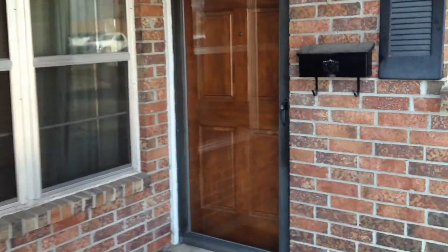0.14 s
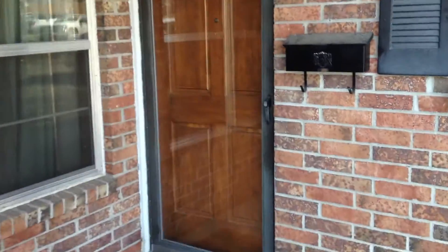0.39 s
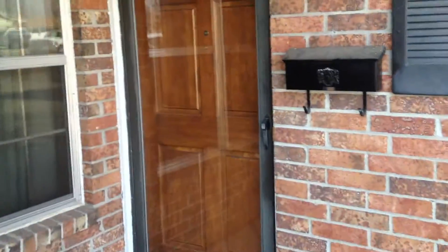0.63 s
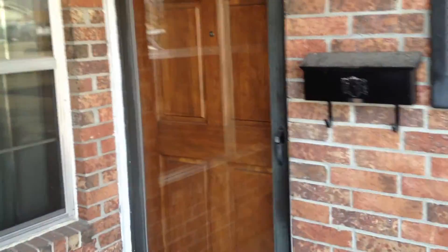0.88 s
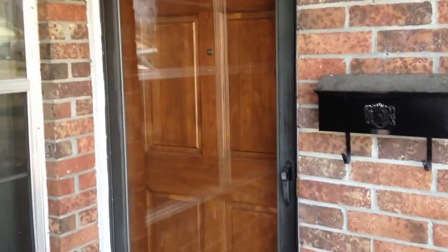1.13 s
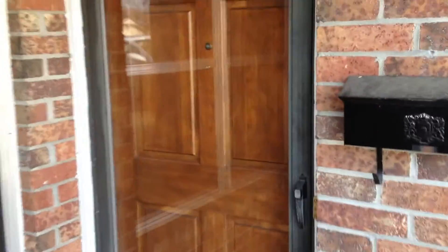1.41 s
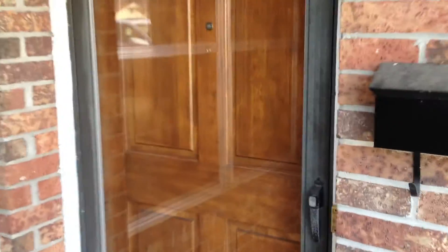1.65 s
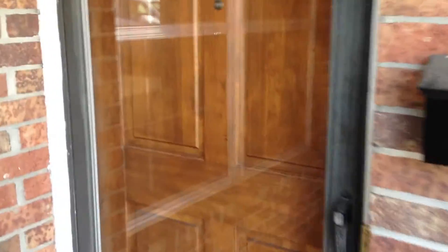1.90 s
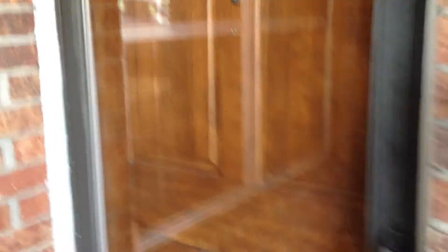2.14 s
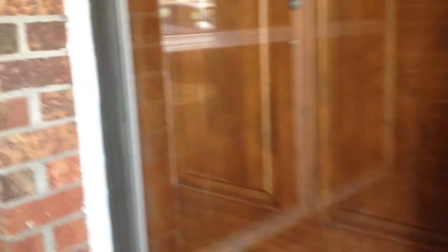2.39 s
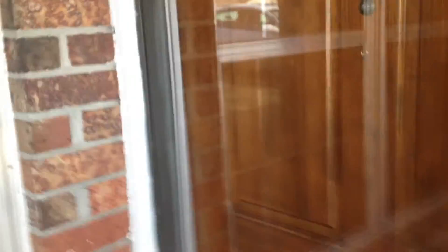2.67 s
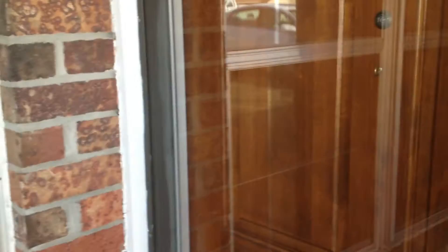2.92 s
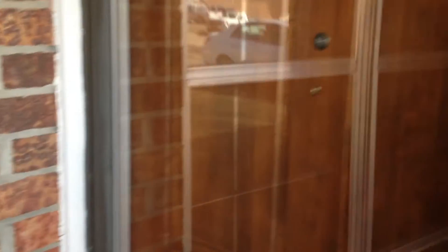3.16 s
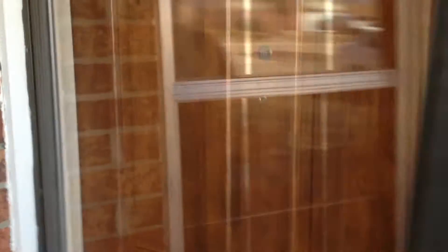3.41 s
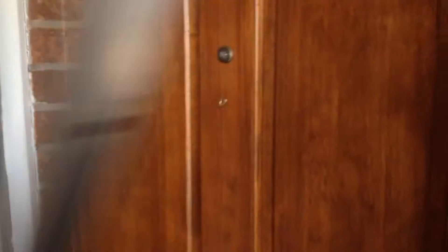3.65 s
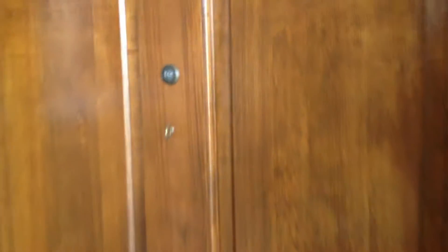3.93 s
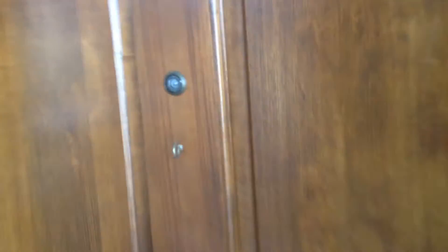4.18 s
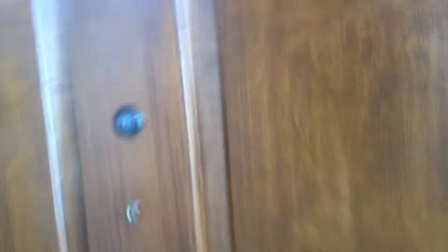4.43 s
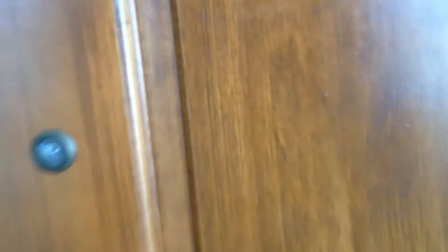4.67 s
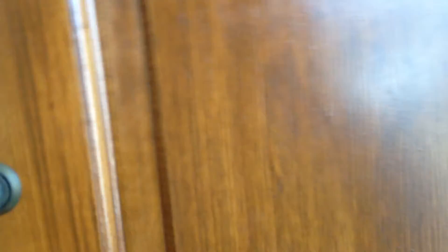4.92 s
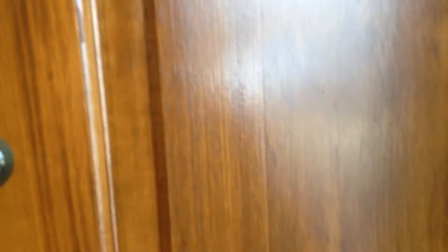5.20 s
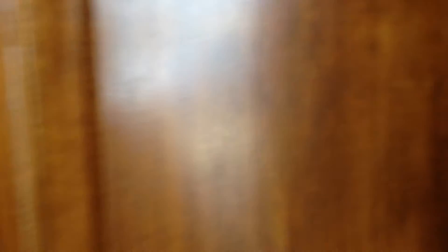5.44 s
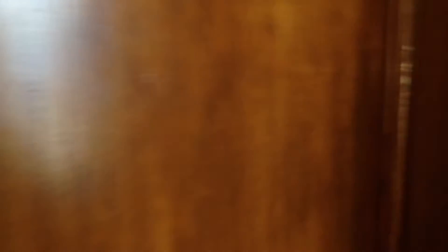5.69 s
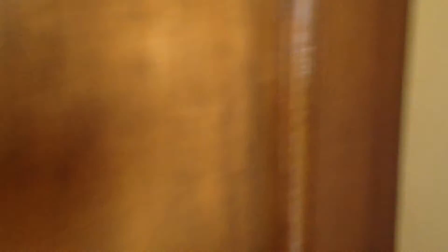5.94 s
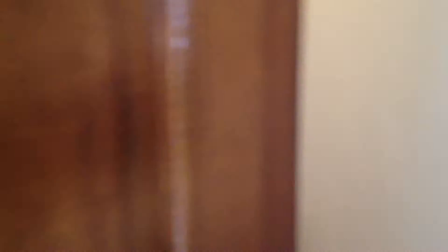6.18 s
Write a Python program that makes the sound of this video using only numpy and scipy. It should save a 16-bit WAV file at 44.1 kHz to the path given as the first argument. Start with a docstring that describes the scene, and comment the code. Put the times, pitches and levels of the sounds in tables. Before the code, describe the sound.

Soft footsteps and chirping birds, sharp metallic handle clicks, a pop of moving air, a knob clack, a woody door thump, and a brief squeak.

```python
"""Footsteps scuff up a porch among birdsong, with light wind on the microphone and a distant hush.
The latch of a glass storm door clatters and drags and its closer rubs: bursts of force and grit in resonances.
Swinging air pops, a knob turns, and the wooden front door knocks free as a slab of ringing modes.
A hinge squeaks last, a fuzzy sine under a rasp. Birds are unsteady sines; wind and hush are coloured noise.
"""
import sys
import numpy as np
from scipy import signal
from scipy.fft import rfft, irfft, next_fast_len
from scipy.io import wavfile
from scipy.ndimage import uniform_filter1d, map_coordinates

SR = 44100
rng = np.random.default_rng(int(sys.argv[2]) if len(sys.argv) > 2 else 0)


def gain_from_db(level_db):
    """Convert decibel levels to linear amplitude factors (20 dB per decade)."""
    decades = np.asarray(level_db, float) / 20
    return 10 ** decades


def unload_audio(sound):
    """Save the sound as a 16-bit wav file, at the path given as the first command line argument."""
    columns = np.transpose(np.atleast_2d(sound))
    # keep every value between -1 and 1, then stretch to whole-number steps
    steps = np.round(np.clip(columns, -1, 1) * 32767)
    wavfile.write(sys.argv[1], SR, steps.astype(np.int16))


N = 278712
TIME = np.arange(N) / SR  # s

# distant outdoor hush over time: start_s, street_db, hiss_db
HUSH_LEVELS = [(0, -53.5, -58), (.8, -56.5, -64.5), (2.7, -55, -61), (3.5, -49, -61), (4.3, -53.5, -58.5),
               (4.9, -52, -63.5), (5.6, -53.5, -62), (5.97, -52, -59.5), (6.32, -55.5, -65)]
# colours of the street and of the hiss: pitch_hz, relative level_db (per Hz)
STREET_COLOUR = [(120, -50.5), (200, -6), (364, -7), (413, -6.5), (504, -10), (943, -10), (1090, -12),
                 (1170, -13), (2450, -12.5), (6000, -23), (7800, -25.5), (13200, -120)]
HISS_COLOUR = [(2650, -5.5), (4500, -3), (5820, -25), (7110, -4), (13000, -4.5), (15300, -10.5),
               (15800, -9)]
# wind buffeting over time: start_s, level_db
WIND_LEVELS = [(0, -58), (.07, -64.5), (.2, -43), (.35, -63), (.47, -56), (.91, -64), (.97, -42.5),
               (1.24, -62.5), (1.6, -60.5), (1.95, -66), (2.19, -59), (2.68, -71), (3.09, -52),
               (3.47, -49.5), (3.62, -62), (3.76, -53), (3.85, -55), (3.9, -38), (4.03, -41.5), (4.2, -58),
               (4.29, -44), (4.41, -58), (4.56, -48), (4.89, -48), (5.2, -56.5), (6.32, -54.5)]
# colour of the buffeting: pitch_hz, relative level_db (per Hz)
BUFFET_COLOUR = [(15, -63), (25, -47), (103, -8.5), (162, -5), (288, -12.5), (322, -14.5), (394, -23),
                 (420, -33), (500, -18), (650, -76), (1100, -120)]
# air pops on the microphone: start_s, level_db, pitch_hz
AIR_POPS = [(3.889, -30, 172), (3.924, -27.5, 160), (3.954, -26.5, 160), (3.993, -17, 247),
            (4.041, -33, 152), (4.085, -37, 159), (4.12, -35, 151), (4.274, -30, 260), (4.546, -33.5, 173)]

# soles scuffing the porch: start_s, level_db, tilt_db (per octave)
SCUFFS = [(0.0246, -39.5, 2.5), (0.5606, -45, 0.5), (1.071, -48, 0.5), (1.602, -41.5, 1.5),
          (2.0941, -38.5, 3.5), (2.534, -32.5, 1.5), (2.563, -36, 0.5)]
# heels thudding after some scuffs: start_s, level_db
HEEL_THUDS = [(.644, -46), (1.155, -51.5), (1.683, -43.5), (2.15, -38.5)]
# resonances of sole on porch: pitch_hz, width_hz, level_db
SOLE_MODES = [(306, 128, 17), (920, 220, 1), (1630, 830, 4), (3850, 4300, 1.5), (10400, 27000, -2)]
# decay of the doorway's answer: pitch_hz, t60_s
PORCH_DECAY = [(150, 0.46), (700, 0.49), (2000, 0.22), (10000, 0.19)]

# near bird: level_db of each chirp
CHIRP_LEVELS = [-53, -56, -55.5, -63, -56.5, -54.5, -61.5]
# contour of one chirp: time_s (from its start), pitch_hz, relative level_db
CHIRP_CONTOUR = [(0, 3290, 1), (.018, 3780, 0), (.028, 3870, 7), (.06, 3970, -3), (.09, 3900, -14),
                 (.13, 3840, -6)]
# whistles of other birds: start_s, length_s, from_hz, to_hz, level_db (at the swell)
BIRD_WHISTLES = [(1.08, .06, 2650, 3300, -46), (1.2, .11, 3120, 2920, -58), (1.12, .12, 4720, 4660, -61),
                 (1.41, .23, 2830, 2430, -54)]
# one hoarse falling call: start_s, length_s, from_hz, to_hz, level_db (at the swell)
HOARSE_CALL = (2.22, .09, 4000, 2850, -50)

# latch contacts: start_s, level_db, tilt_db (per octave), narrow_db (per octave squared), t60_s
STORM_CONTACTS = [(2.751, -23.5, 1.5, 1.7, 0.068), (2.759, -15, 0.5, 1.4, 0.13),
                  (2.767, -14, -5, 3.6, 0.19), (2.82, -23, -13, 4.6, 0.029), (2.829, -10.5, -0.5, 2.1, 0.1),
                  (2.842, -20, -7.5, 3.34, 0.15), (2.872, -32.5, -0.5, 3.2, 0.38),
                  (3.066, -25, -1, 0.33, 0.045), (3.104, -27.5, 3.5, 1.3, 0.097),
                  (3.122, -18, 4, 2.04, 0.062), (3.139, -13, -0.5, 2.2, 0.036),
                  (3.178, -13.5, 6.5, 6.3, .05), (3.264, -37.5, -1, .2, 0.14),
                  (3.293, -12.5, 8.5, 7.9, 0.037), (3.297, -8, 13.5, 8.5, 0.037),
                  (3.307, -20, -1, 2.5, 0.27), (3.413, -31.5, -1.5, 0.56, 0.13), (3.459, -35, -0.5, 2, .08),
                  (3.554, -37, 5.5, 2.9, 0.26), (3.591, -32, 3.5, 3.4, 0.11), (3.666, -38, 2.5, 2.2, 0.11),
                  (3.744, -38, -1, 0.98, 0.25)]
KNOB_CONTACTS = [(3.93, -40, 3.5, 0.7, 0.18), (3.97, -38.5, 3, .6, 0.12), (4.088, -29, 0.5, 4, 0.042),
                 (4.21, -21, 1, 2.5, 0.15), (4.223, -33.5, 1.5, -2, .025), (4.24, -35, -0.5, -0.2, 0.18),
                 (4.366, -34, -10, 21, 0.021), (4.411, -35, -13, 25, .04), (4.697, -62.5, 4.5, -3.5, 0.034),
                 (4.729, -10.5, 4, 3.5, 0.039), (4.747, -26, 1, -1, 0.019), (4.808, -28.5, 1, 0.8, 0.078),
                 (4.841, -34.5, -12.5, 5, 0.087), (5.281, -26, 4.5, 0.53, 0.027),
                 (5.645, -29, 3.5, 2.5, .1), (5.679, -27, 6, 3, 0.095), (5.71, -37.5, -4, 4.5, 0.14),
                 (5.81, -31, -9, 16.5, 0.083)]
# resonances of each latch: pitch_hz, width_hz, level_db
STORM_MODES = [(274, 88, 12.5), (481, 39, 10), (684, 180, -0.5), (1280, 310, 0), (1616, 216, 6),
               (1840, 300, 6), (2180, 370, 5.5), (2600, 470, 4), (3840, 330, 2.5), (4700, 500, 1),
               (5900, 1700, -2.5), (7800, 1860, 1.5), (10000, 2100, 2.5), (12200, 2900, 2)]
KNOB_MODES = [(260, 110, 5), (442, 175, 14), (733, 93, 8.5), (970, 260, 6), (1643, 320, 6),
              (2220, 274, 9.5), (2515, 590, 4), (3180, 740, 1), (4140, 570, -2), (4600, 430, -3.5),
              (6330, 1300, -8), (8200, 1150, -4.5), (10560, 1300, -4.5), (12100, 2000, -6)]
# the storm latch drags over its striker: start_s, level_db (before the trim in scrape)
SCRAPE_LEVELS = [(3.03, -56.5), (3.07, -39.5), (3.1, -34.5), (3.125, -26), (3.165, -32), (3.2, -30.5),
                 (3.23, -39.5), (3.29, -56)]
# colour of that drag: pitch_hz, relative level_db (per Hz)
DRAG_COLOUR = [(120, -50), (200, -18), (288, -0.5), (508, -9), (599, -5), (1100, -9), (1490, 0),
               (3730, -7.5), (12000, -25), (15800, -41)]
# the storm door's closer rubs: start_s, low_db, high_db
CLOSER_LEVELS = [(3.42, -57, -72), (3.47, -56.5, -77), (3.61, -53, -62), (3.7, -59, -59), (3.83, -54, -53),
                 (3.92, -66, -82)]
# the closer's narrow tones, then its airy rub: pitch_hz, width_hz, relative level_db
CLOSER_TONES = [(1486, 27, 0), (1760, 30, 4), (1977, 32, 0), (2330, 40, -8), (2640, 40, 0.5)]
CLOSER_AIR = [(8800, 330, 1), (9160, 160, 5), (11000, 7100, -10)]

# the front door slab jolts off its stop: start_s, level_db
SLAB_JOLTS = [(5.275, -19), (5.282, -18), (5.299, -37)]
# ringing modes of the slab: pitch_hz, relative level_db, t60_s
SLAB_MODES = [(166, -3.5, 0.1), (222, -4.5, .14), (247, 3, 0.2), (376, 2.5, 0.13), (410.6, 2.5, 0.13),
              (473, 4, 0.1), (526, -6, 0.099), (638, -0.5, 0.18), (714, -6.5, 0.14), (726, -3.5, 0.041),
              (1030, -20, 0.062), (1074, -10, 0.11), (1330, -12, 0.09)]
# colour of the slab breaking free of its seal: pitch_hz, relative level_db (per Hz)
CRACK_COLOUR = [(35, -43.5), (60, -10.5), (456, 1.5), (1270, -17), (1460, -23), (2130, -17.5),
                (2500, -27.5), (3310, -25), (13400, -47), (15800, -39)]
# colour of the hallway answering behind the door: pitch_hz, relative level_db (per Hz)
BOOM_COLOUR = [(47, -51), (80, -23), (155, -1.5), (261, -8), (323, -23), (413, -3), (444, -6.5),
               (2500, -37.5), (3250, -70), (5500, -120)]
# hinge: start_s, pitch_hz, squeal_db, rasp_db (levels before the trims in hinge)
HINGE_CONTOUR = [(6.15, 2440, -87, -82), (6.21, 2470, -83, -86), (6.295, 2590, -43.5, -45),
                 (6.32, 2520, -46, -42)]
# resonances of the hinge's rasp: pitch_hz, width_hz, relative level_db
RASP_MODES = [(6000, 1100, 3), (7140, 480, 6.0), (7700, 810, 1)]


def unit(x):
    """Scales a sound to rms 1."""
    return x / np.sqrt(np.mean(x ** 2) + 1e-20)


def along(points, hz):
    """Reads (pitch_hz, value) points on a log pitch axis."""
    f, value = np.transpose(points)
    return np.interp(np.log(hz + 1), np.log(f + 1), value)


def curves(rows):
    """One value per sample for each column, and a soft-edged gate open while the table lasts."""
    s, *columns = np.transpose(rows)
    is_open = 1. * (TIME >= s[0]) * (TIME <= s[-1])
    gate = uniform_filter1d(is_open, size=400, mode="nearest")
    return [np.interp(TIME, s, column) for column in columns] + [gate]


def wobble(rate):
    """A smooth random curve through normal draws, rate knots a second."""
    knots = rng.standard_normal(int(N * rate / SR) + 4)
    return map_coordinates(knots, [TIME * rate])


def filtered(x, response):
    """Passes x through a complex response of frequency."""
    m = next_fast_len(len(x) + 8192)  # room for the ringing
    return irfft(rfft(x, m) * response(np.fft.rfftfreq(m, 1 / SR)), m)[:len(x)]


def resonances(modes):
    """Causal response of damped modes, their signs alternating down the table."""
    def response(f):
        total = 0
        for k, (centre, width, db) in enumerate(modes):
            band = 1j * f * width
            total = total + (-1) ** k * gain_from_db(db) * band / (centre * centre - f * f + band)
        return total
    return response


def noise(colour):
    """Coloured noise of rms 1."""
    return unit(filtered(rng.standard_normal(N), lambda hz: gain_from_db(along(colour, hz))))


def contacts(rows, modes, rise, hold, snap, grit, spread_db):
    """Each contact drives the modes with a snap and a gritty burst of force, in a colour of its own."""
    out, t = np.zeros(N + SR), np.arange(SR // 2) / SR
    octaves = np.log2(np.transpose(modes)[0] / 2000)  # tilt and narrowing pivot at 2000 Hz
    for s, db, tilt_db, narrow_db, t60 in rows:
        fade = gain_from_db(-60 * np.maximum(t - rise - hold, 0) / max(t60, .005))
        shape = np.minimum(t / rise, 1) * fade
        roughness = uniform_filter1d(rng.standard_normal(len(t)), size=36) * 1.74
        force = shape * rng.standard_normal(len(t)) * gain_from_db(grit * roughness)
        force *= np.linalg.norm(shape) / np.linalg.norm(force)
        force[round(.7 * rise * SR)] += snap  # first hard touch
        colour = tilt_db * octaves - narrow_db * octaves ** 2
        colour = colour + rng.normal(0, spread_db, len(modes))  # every contact lands elsewhere
        struck = [(hz, w, g + d) for (hz, w, g), d in zip(modes, colour)]
        first = max(round((s - .7 * rise) * SR), 0)
        out[first:][:len(t)] += gain_from_db(db) * filtered(force, resonances(struck))
    return out[:N]


def hush():
    """Distant street and air: two coloured noises, gently uneven in level."""
    street_db, hiss_db, _ = curves(HUSH_LEVELS)
    street = gain_from_db(street_db + 1.22 * wobble(8)) * noise(STREET_COLOUR)
    hiss = gain_from_db(hiss_db + 0.12 * wobble(6.1)) * noise(HISS_COLOUR)
    return street + hiss


def wind():
    """Lumpy low buffeting, with single pops as the swinging door pushes air."""
    db, _ = curves(WIND_LEVELS)
    out = gain_from_db(db) * unit(gain_from_db(4.2 * wobble(25)) * noise(BUFFET_COLOUR))
    for s, pop_db, hz in AIR_POPS:
        cycles = (TIME - s) * hz
        swell = np.exp(-((cycles - .3) / np.where(cycles < .3, .15, 1.1)) ** 2)  # fast in, slow out
        out = out + gain_from_db(pop_db) * np.sin(2 * np.pi * cycles) * swell
    return out


def footsteps():
    """Each sole scuffs the porch in a soft gritty burst; some heels thud after it with a snap."""
    narrow_db, t60_s = 2, .13
    scuffs = [(s, db, tilt_db, narrow_db, t60_s) for s, db, tilt_db in SCUFFS]
    heel_tilt_db, heel_narrow_db, heel_t60_s = -8.5, 2.5, 0.089
    heels = [(s, db, heel_tilt_db, heel_narrow_db, heel_t60_s) for s, db in HEEL_THUDS]
    return (contacts(scuffs, SOLE_MODES, rise=.009, hold=0.023, snap=0, grit=8.0, spread_db=1.95)
            + contacts(heels, SOLE_MODES, rise=0.0027, hold=0, snap=4.4, grit=1.0, spread_db=2.5))


def porch(x):
    """The doorway answers with a noise tail in which each frequency dies at its own speed."""
    hz, t, z = signal.stft(rng.standard_normal(SR // 2), SR, nperseg=256)
    fade = gain_from_db(-60 * t / along(PORCH_DECAY, hz)[:, None])
    tail = signal.istft(z * fade, SR, nperseg=256)[1]
    late = np.pad(x, (250, 0))  # samples of delay before the answer
    return signal.fftconvolve(late, tail / np.linalg.norm(tail))[:N]


def whistle(rows, start=0, db=0, fuzz_hz=45):
    """An unsteady sine along a pitch and level contour."""
    hz, level_db, gate = curves(np.add(rows, [start, 0, db]))
    phase = 2 * np.pi * np.cumsum(hz + fuzz_hz * wobble(200)) / SR
    return gate * gain_from_db(level_db + 2.5 * wobble(92.1)) * np.sin(phase)


def glide(s, length, from_hz, to_hz, db):
    """Contour of a straight glide that swells and fades."""
    peak_at, edge_db = .4, -11  # share of the length; level of both ends under the swell
    peak_hz = from_hz + peak_at * (to_hz - from_hz)
    return [(s, from_hz, db + edge_db), (s + peak_at * length, peak_hz, db), (s + length, to_hz, db + edge_db)]


def birds():
    """One bird repeats a rising chirp at an even pace, others whistle across it, one rasps once."""
    first_s, every_s = .057, .264
    chirps = sum(whistle(CHIRP_CONTOUR, first_s + k * every_s, db) for k, db in enumerate(CHIRP_LEVELS))
    others = sum(whistle(glide(*row)) for row in BIRD_WHISTLES)
    return chirps + others + whistle(glide(*HOARSE_CALL), fuzz_hz=353)


def storm_latch():
    """The storm door's latch clatters: snaps and short grit ring its resonances."""
    return contacts(STORM_CONTACTS, STORM_MODES, rise=0.0021, hold=0, snap=2.5, grit=3, spread_db=1.0)


def scrape():
    """Dense grit under one pull of the handle: coloured noise, rough in level."""
    db, gate = curves(SCRAPE_LEVELS)
    roughness = gain_from_db(1.8 * wobble(500) + 2.1 * wobble(70))
    return gate * gain_from_db(db + 1.5) * unit(roughness * noise(DRAG_COLOUR))


def closer():
    """Friction in the door closer feeds narrow resonances and an airy rub, each slipping on its own."""
    low_db, high_db, gate = curves(CLOSER_LEVELS)
    low = unit(sum(gain_from_db(5 * wobble(14)) * filtered(rng.standard_normal(N), resonances([mode]))
                   for mode in CLOSER_TONES))
    high = unit(filtered(rng.standard_normal(N), resonances(CLOSER_AIR)))
    return gate * (gain_from_db(low_db + 2.5 * wobble(66)) * low + gain_from_db(high_db + 3.5 * wobble(35)) * high)


def knob_latch():
    """The front door's knob turns: snaps and coarser grit ring its resonances."""
    return contacts(KNOB_CONTACTS, KNOB_MODES, rise=0.001166, hold=0, snap=3.7, grit=6.0, spread_db=1.5)


def front_door():
    """Each jolt rings the slab's modes; the first also cracks the seal and sets the hallway booming."""
    out, t = np.zeros(N + SR), np.arange(SR // 2) / SR
    for s, db in SLAB_JOLTS:
        ring = 0
        for hz, mode_db, t60 in SLAB_MODES:
            level = gain_from_db(mode_db + rng.normal(0, 1.1) - 60 * t / t60)
            ring = ring + level * np.sin(2 * np.pi * hz * t + rng.uniform(0, 2.18))
        out[round(s * SR):][:len(t)] += gain_from_db(db) * ring * (1 - np.exp(-t / 0.00085))
    since = np.maximum(TIME - SLAB_JOLTS[0][0] + 0.0022, 0)  # starts 2.2 ms ahead of the first jolt
    crack = (1 - np.exp(-since / 0.00057)) * gain_from_db(-12.0 - 60 * since / 0.14) * noise(CRACK_COLOUR)
    boom = (1 - np.exp(-since / 0.012)) * gain_from_db(-24.5 - 60 * since / 0.63) * noise(BOOM_COLOUR)
    return out[:N] + crack + boom


def hinge():
    """A fuzzy squeal, a sine of jittering pitch and level, with a brighter noise rasp above it."""
    hz, squeal_db, rasp_db, gate = curves(HINGE_CONTOUR)
    phase = 2 * np.pi * np.cumsum(hz + 90 * wobble(300)) / SR
    squeal = np.sin(phase) * gain_from_db(squeal_db + 4.0 + 3.2 * wobble(120))
    rasp = unit(filtered(rng.standard_normal(N), resonances(RASP_MODES)))
    return gate * (squeal + gain_from_db(rasp_db - 4.0) * rasp)


def scene():
    """Near sounds, slab and birds, answered by the doorway, over wind and hush."""
    near = footsteps() + storm_latch() + scrape() + closer() + knob_latch() + hinge()
    song, slab = birds(), front_door()
    answer = porch(gain_from_db(-10.0) * near + gain_from_db(-14) * slab + gain_from_db(-0.5) * song)
    return (near + slab + song + answer + wind() + hush())[None]


def band_limit(x):
    """A steep low-pass at the top of the band."""
    return signal.sosfilt(signal.butter(12, 16460, fs=SR, output="sos"), x)


def record(dry):
    """Cuts the deepest bass as a microphone does; the treble ends steeply near 15.4 kHz."""
    def response(hz):
        bass_cut = (1j * hz / (70 + 1j * hz)) ** 2
        treble_end = 1 / (1 + (hz / 15420) ** 200)
        return bass_cut * treble_end
    mix = filtered(dry[0], response)[None]
    return band_limit(mix)


dry = scene()
out = record(dry)
unload_audio(out)
```